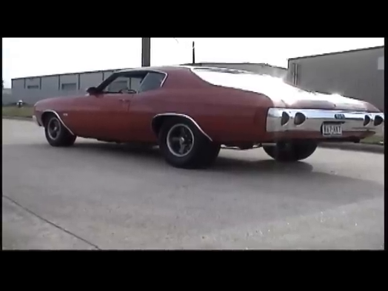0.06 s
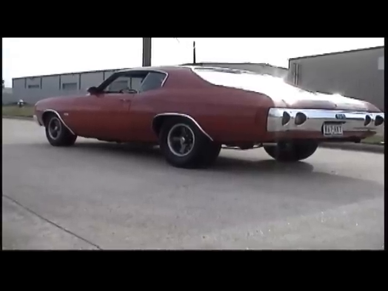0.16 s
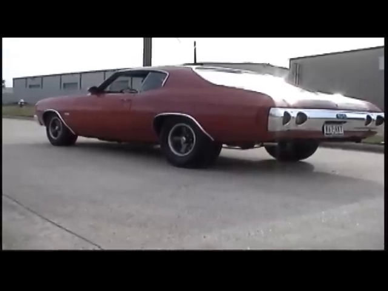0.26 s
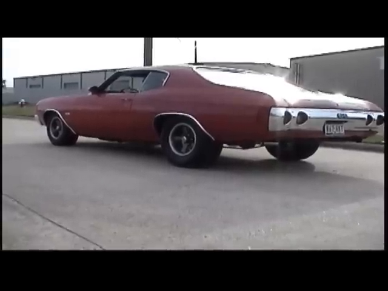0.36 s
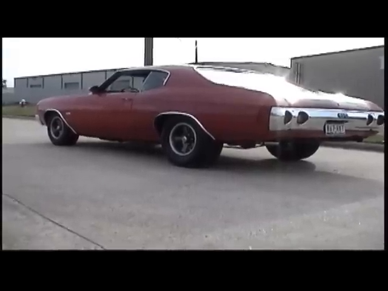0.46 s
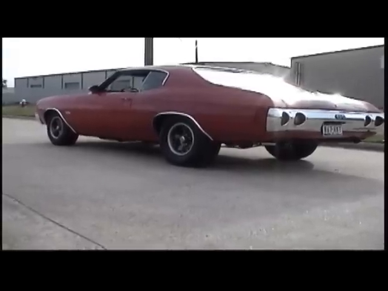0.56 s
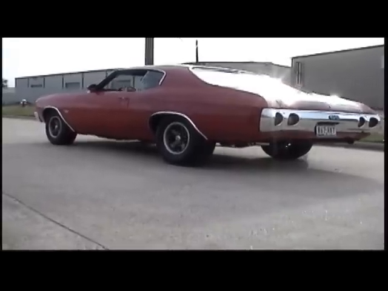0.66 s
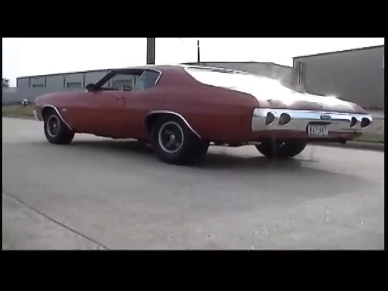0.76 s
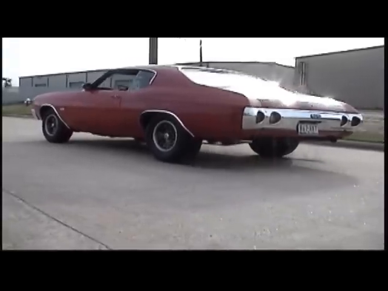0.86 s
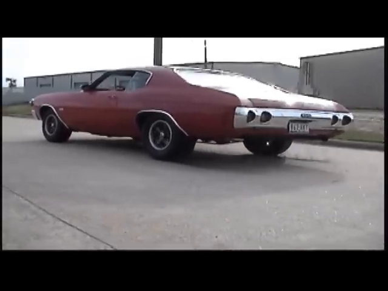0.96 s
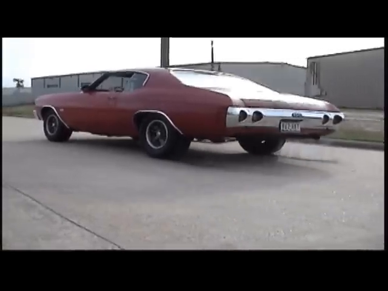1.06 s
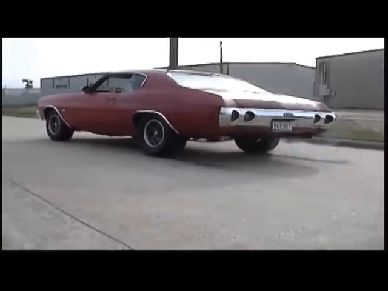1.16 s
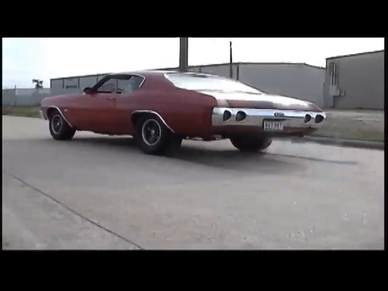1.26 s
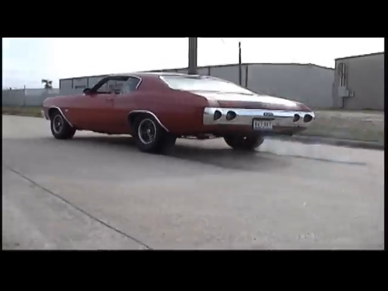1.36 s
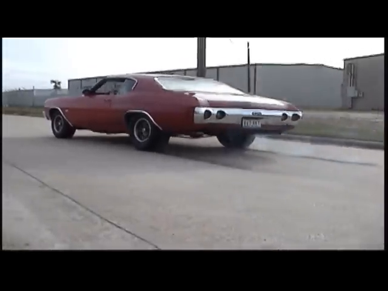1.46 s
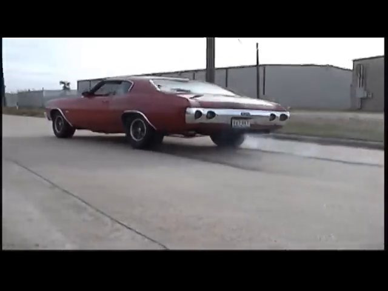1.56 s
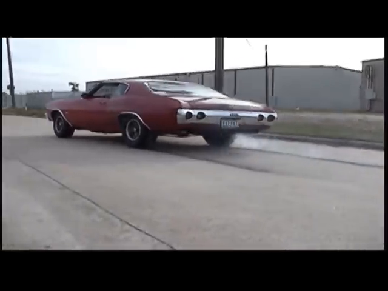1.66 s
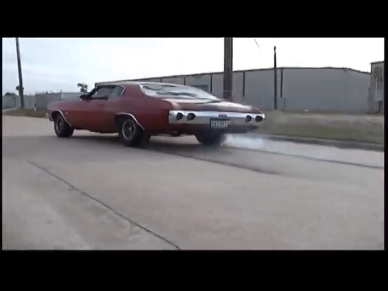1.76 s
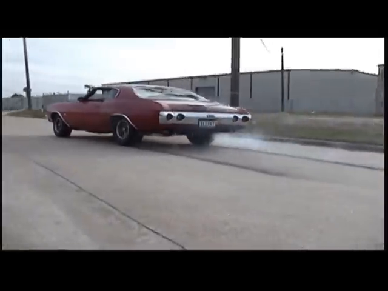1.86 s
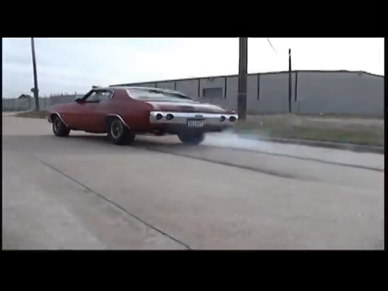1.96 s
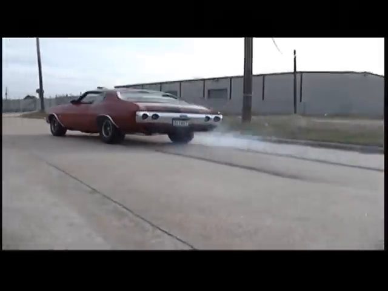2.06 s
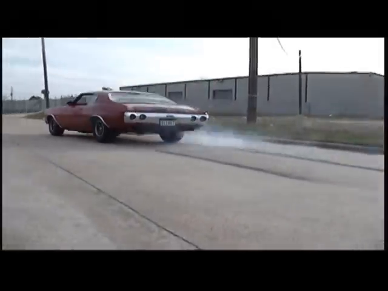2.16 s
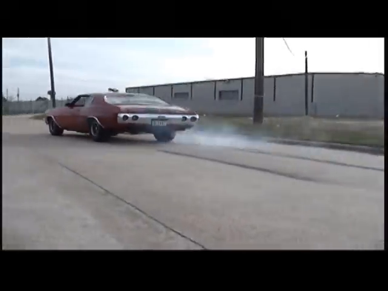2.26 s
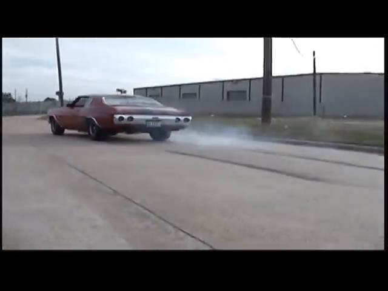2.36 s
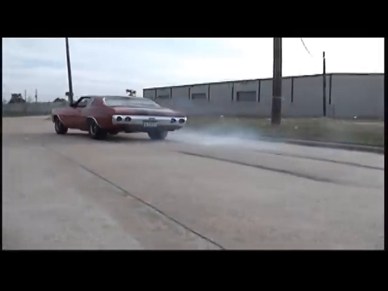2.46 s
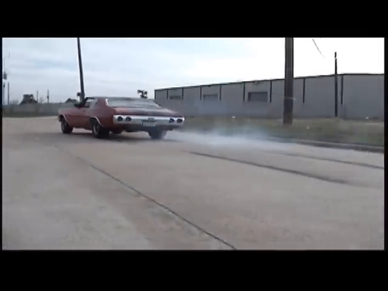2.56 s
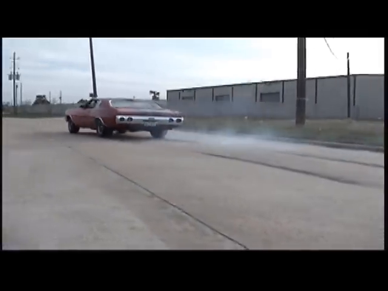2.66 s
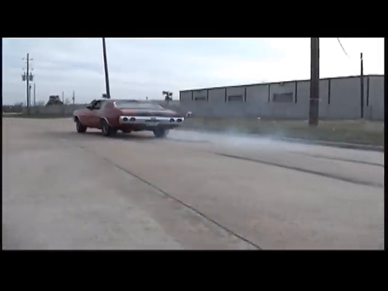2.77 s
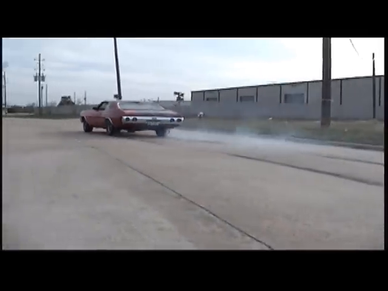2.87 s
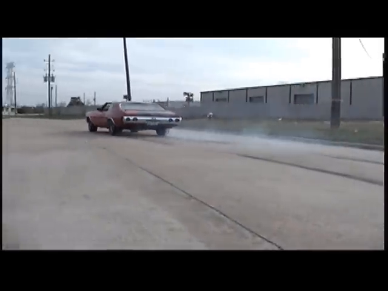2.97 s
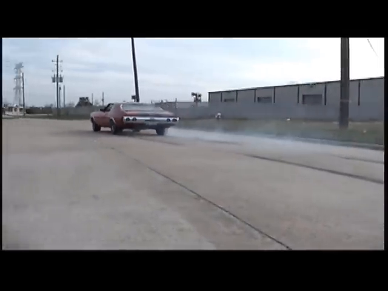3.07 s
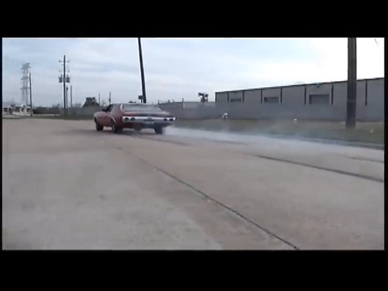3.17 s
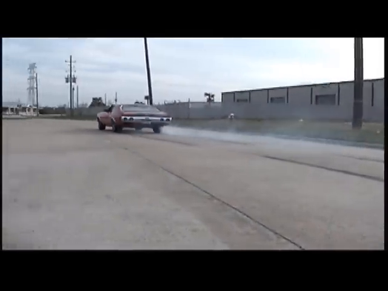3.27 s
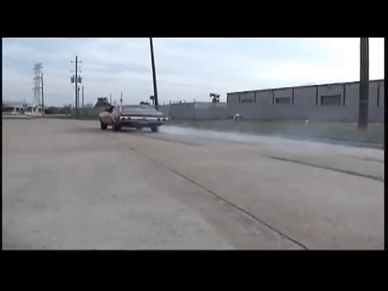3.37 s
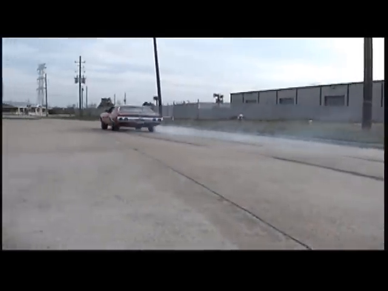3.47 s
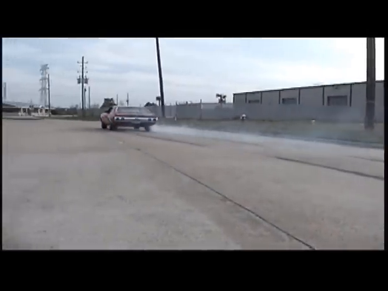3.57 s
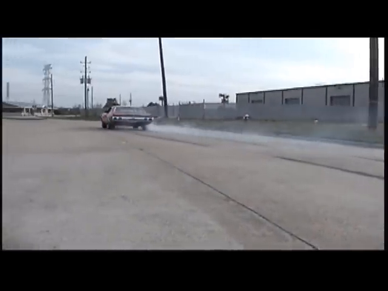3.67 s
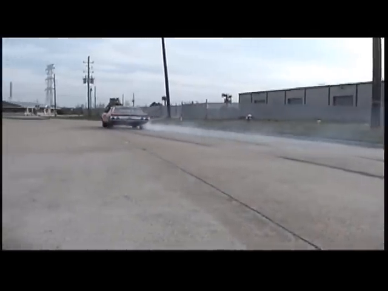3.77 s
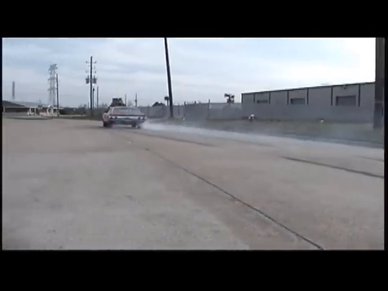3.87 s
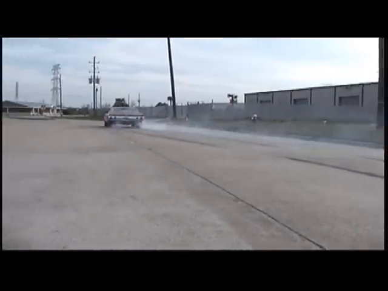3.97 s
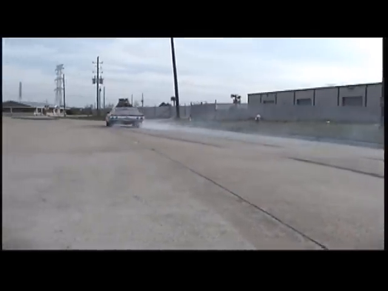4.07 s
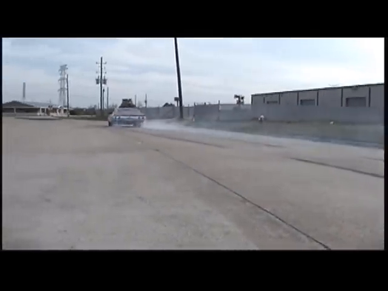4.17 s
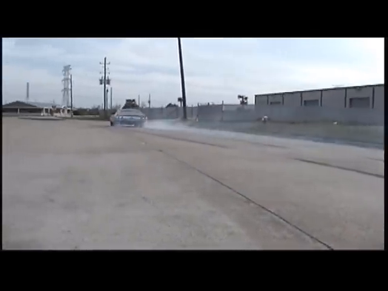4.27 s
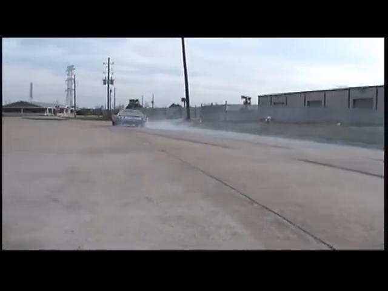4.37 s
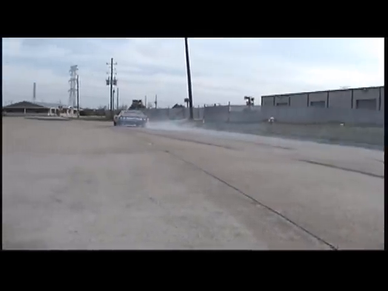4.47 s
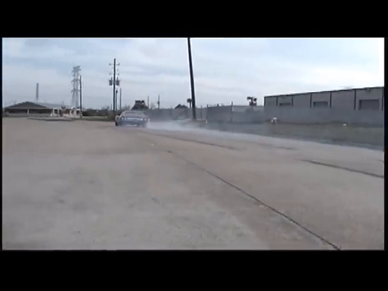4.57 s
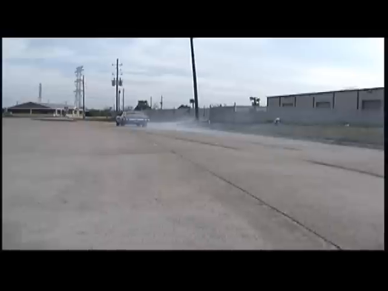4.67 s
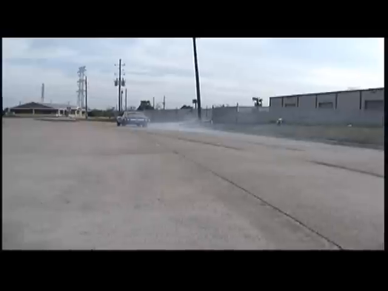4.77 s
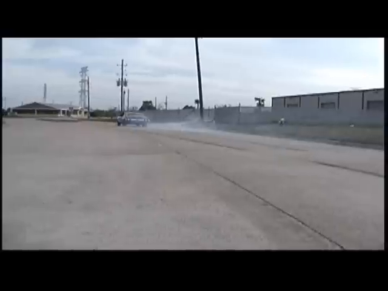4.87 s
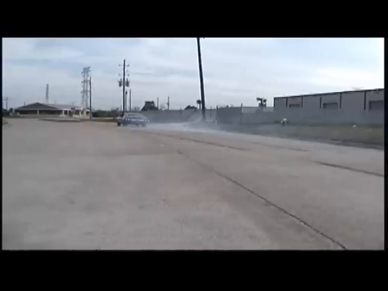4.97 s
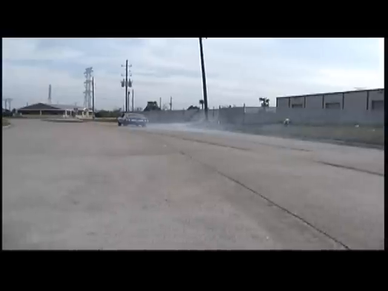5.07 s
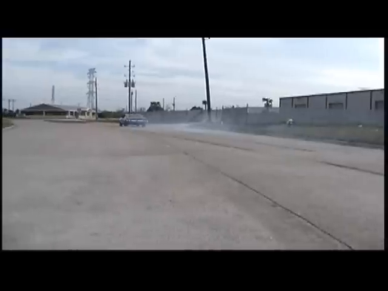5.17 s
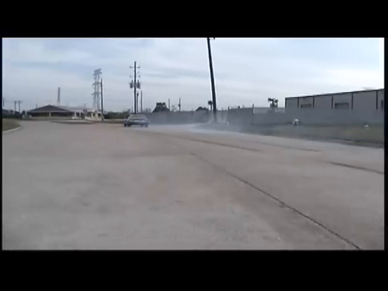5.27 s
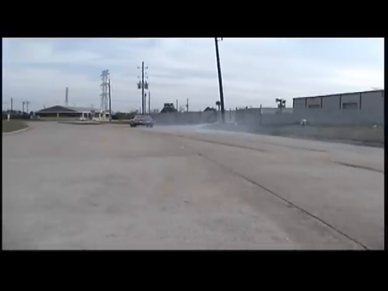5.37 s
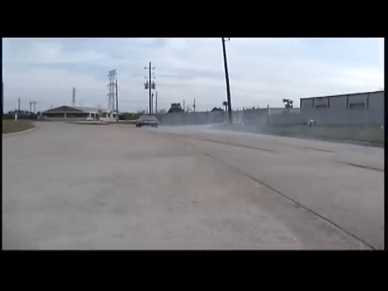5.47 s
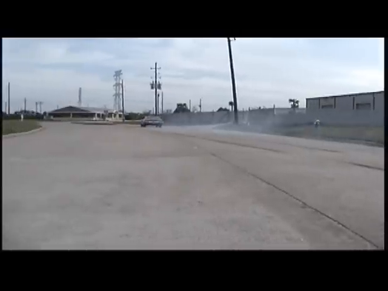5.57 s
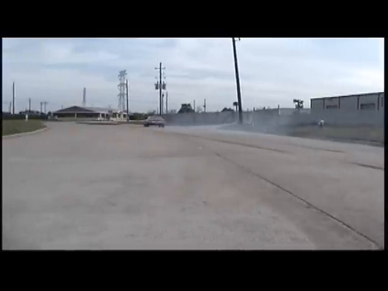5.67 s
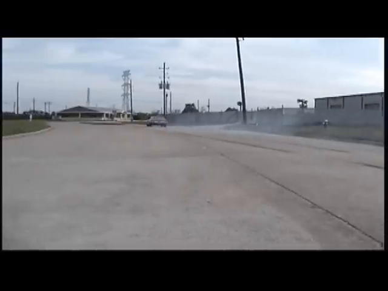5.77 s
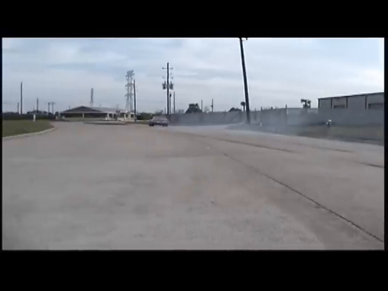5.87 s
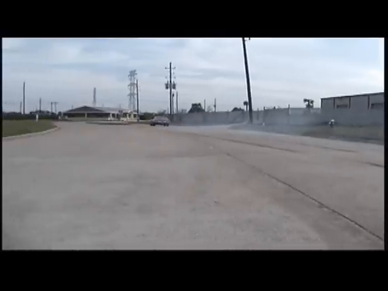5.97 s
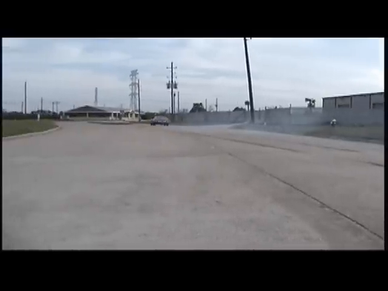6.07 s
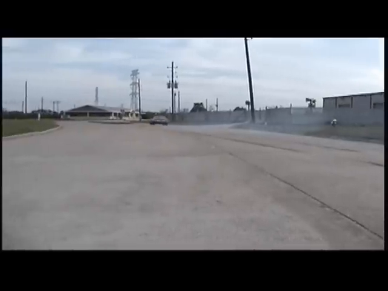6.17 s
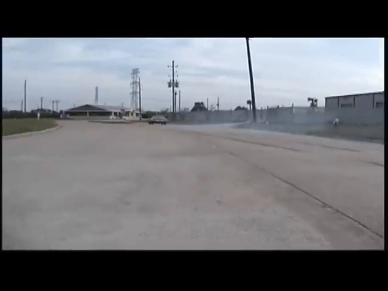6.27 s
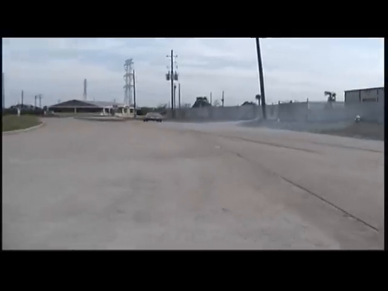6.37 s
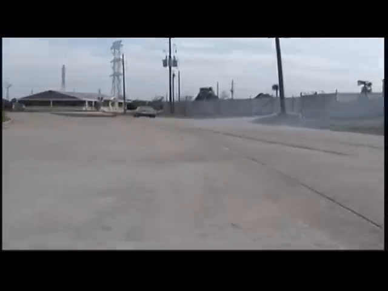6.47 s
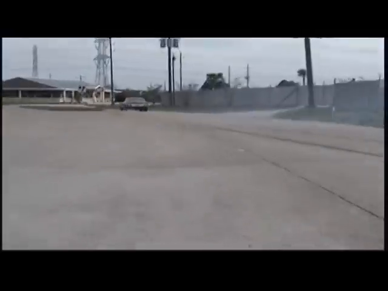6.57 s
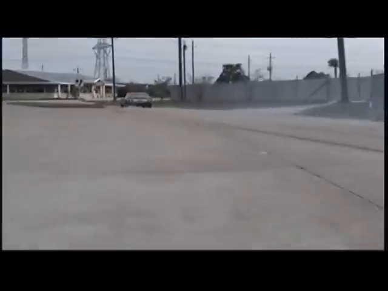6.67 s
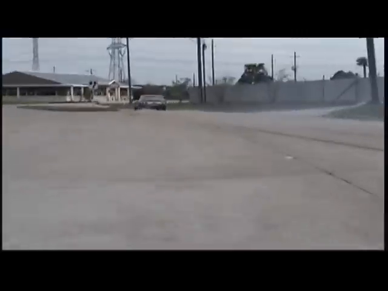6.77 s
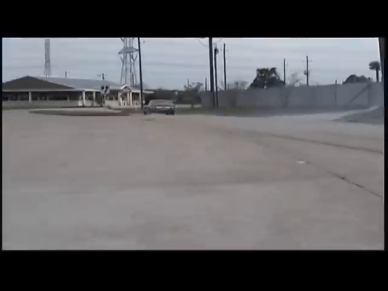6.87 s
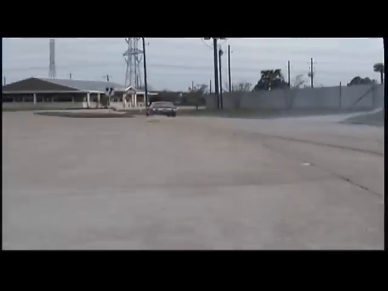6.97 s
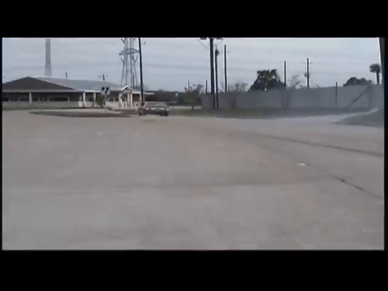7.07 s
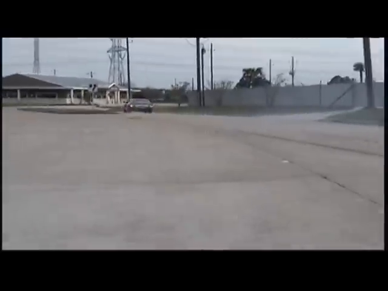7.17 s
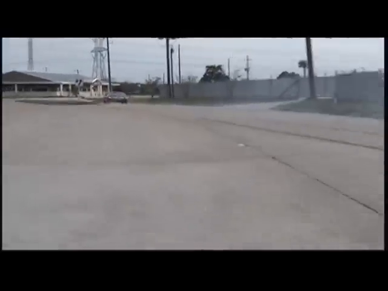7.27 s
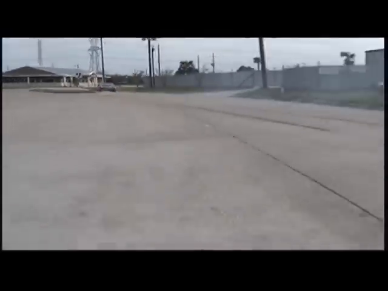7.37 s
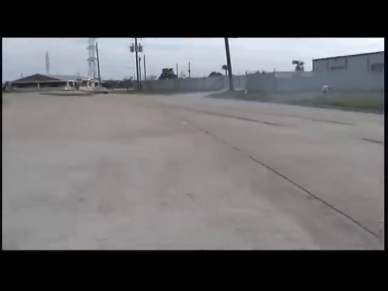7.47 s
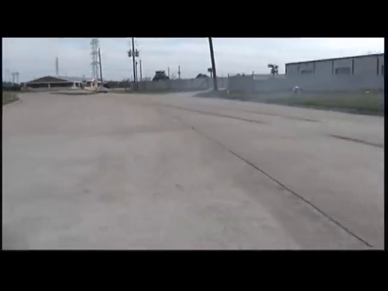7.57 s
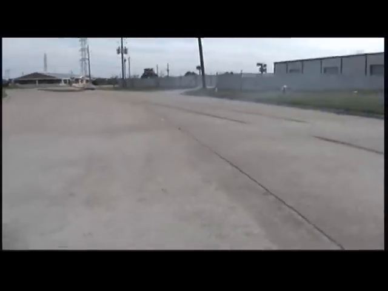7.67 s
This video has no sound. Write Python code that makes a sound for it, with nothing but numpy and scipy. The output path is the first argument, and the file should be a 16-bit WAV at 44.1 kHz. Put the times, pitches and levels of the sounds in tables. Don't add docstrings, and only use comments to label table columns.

```python
import sys
import numpy as np
from scipy import signal
from scipy.fft import rfft, irfft, next_fast_len
from scipy.io import wavfile
from scipy.ndimage import uniform_filter1d

SR = 44100
rng = np.random.default_rng(int(sys.argv[2]) if len(sys.argv) > 2 else 0)


def put_to_file(sound):
    columns = np.atleast_2d(sound).T
    safe = np.clip(columns, -1, 1)
    whole_steps = np.round(safe * 32767)
    wavfile.write(sys.argv[1], SR, whole_steps.astype(np.int16))


def voltage_ratio(level):
    return 10 ** (np.asarray(level, float) / 20)


N = 340222
PADDED = next_fast_len(N, True)

# t/s, level/dB, load/0-1
DRIVE = [(0, -30, 0), (.03, -28.5, 0.08), (.45, -30, 0), (.6, -31, 0.46), (1.05, -28.5, 1),
         (1.25, -27, 0.1), (1.82, -24, 0.54), (1.91, -33, 0.3), (2.0, -28.5, 0.37), (2.3, -31, 0.24),
         (3.0, -30, 0.36), (3.5, -31, 0.4), (4.05, -31.5, 0.5), (4.09, -42, 0.01), (4.4, -45, 0),
         (4.55, -36.5, 0.44), (5.32, -45, 0.26), (6.63, -42.5, 0.43), (6.77, -60, 0)]
# t/s, rate/cycles per s
REVS = [(0, 16.1), (.2, 16.6), (.59, 16.6), (.66, 22), (.78, 25.3), (1, 28.3), (1.2, 32.6), (1.55, 37.6),
        (1.85, 40.7), (1.93, 38.6), (2.2, 32.6), (2.27, 31.8), (2.6, 28.9), (2.9, 30.8), (3.5, 32.9),
        (4.04, 33.5), (4.4, 26.5), (4.7, 20.9), (5, 20.2), (5.3, 16.7), (5.43, 16.5), (5.7, 17.85),
        (5.85, 17.5), (6, 18), (6.2, 18.6), (6.67, 20.1)]
# start t/s, length/s, extra level/dB
STABS = [
    (0.462, 0.17, 5),
    (2.275, .14, 5.5),
    (4.409, 0.062, 4),
    (5.248, 0.025, 6),
]


def noise(*shape):
    return rng.standard_normal((*shape, N))


def level(x, db):
    return x * voltage_ratio(db) / np.sqrt(np.mean(x ** 2))


def curves(tables):
    s, *columns = np.concatenate(tables).T
    return [np.interp(np.arange(N) / SR, s, c) for c in columns]


def along(points):
    hz, value = np.transpose(points)
    bin_hz = np.arange(PADDED // 2 + 1) * SR / PADDED
    return np.interp(np.log(bin_hz + 1), np.log(hz), value)


def shape(x, gain):
    return irfft(rfft(x, PADDED) * gain, PADDED)[..., :N]


def colour(x, points):
    return shape(x, voltage_ratio(along(points)))


def walk(rate):
    k = int(SR / rate)
    held = np.repeat(rng.standard_normal(N // k + 1), k)
    w = uniform_filter1d(uniform_filter1d(held, k), k)[:N]
    return w / w.std()


def resonate(x, hz, width_hz):
    return signal.lfilter(*signal.iirpeak(hz, hz / width_hz, SR), x)


def bumps(rows, width_s=None):
    t = np.arange(N) / SR
    return sum(row[1] * np.exp(-((t - row[0]) / (width_s or row[2])) ** 2) for row in rows)


def gate(start, end, rise_s, fall_s):
    risen = start + rise_s
    times = [start, risen, max(end, risen), max(end + fall_s, start + 2 * rise_s)]
    return np.interp(np.arange(N) / SR, times, [0, 1, 1, 0])


def decays(events, decay_s):
    t = np.arange(N) / SR
    return sum(voltage_ratio(db) * np.exp(-np.maximum(t - s, 0) / decay_s) * (t > s) for s, db in events)


def throttle(spinning):
    (hz,), (db, load) = curves([REVS]), curves([DRIVE])
    idle = gate(-1, STABS[0][0], .1, .1)
    stabs = [gate(s, s + length, 0.027, 0.0099) for s, length, _ in STABS]
    stab = sum(stabs)
    flare, flare_fall_s = 3.8, .19
    hz = hz + flare * sum(gate(s, s, .8 * length, flare_fall_s + length) for s, length, _ in STABS[1:-1])
    hunt = .006 * np.clip(2 - hz / 16, .15, 1) * walk(15)
    hz = hz * (1 + hunt + .012 * idle * walk(12))
    scatter_db = .4 + 2.2 * stab + .6 * np.clip(2 - hz / 16, 0, 1) + 1.2 * idle
    spin_duck_db, spin_gas_db = -4.5, 5.5
    db = db + sum(g * row[2] for g, row in zip(stabs, STABS)) + spin_duck_db * spinning
    boom_db = 8.5 - 30 * load - 8 * stab
    last_pull = (6.5, 4, 0.24)
    gas_db = -7 + spin_gas_db * spinning + stab + bumps([last_pull])
    return hz, scatter_db, db, boom_db, gas_db


def overrun(spinning):
    full_fall = 11
    fall = -np.gradient(curves([REVS])[0]) * SR / full_fall
    shut = np.clip(fall, 0, 1) * (1 - spinning)
    shut = shut * (1 - sum(gate(s, s + length, .01, .01) for s, length, _ in STABS))
    return uniform_filter1d(shut, size=2000)


def firings(hz, scatter_db, shut):
    # level/dB, header lag/ms
    cylinders = [(3.6, .3), (-4.5, -.2), (-10, .13), (.5, -.5), (-6, -.27), (-6, .07), (0, .16), (-6, .3)]
    # level/dB, lag/ms
    shut_cylinders = [(0, .6), (-4, .3), (12, 0), (-4, -.3), (10.5, -.8), (-6, .2), (3, -1.5), (-3, 1.2)]
    # level gained at full revs/dB, lag/s
    banks = [(0, 0.), (15, .0002)]
    firing_banks = [0, 1, 1, 0, 1, 0, 0, 1]
    # t/s, level over the mean firing/dB
    backfires = [
        (0.183, 5.5),
        (2.292, 7.5),
        (2.297, 6),
        (4.462, 4),
        (6.178, 3.5),
        (0.492, 4.5),
        (.553, 6.5),
        (.597, 5.5),
        (2.265, -1),
        (4.428, 7.5),
    ]
    pop_s = 2.2335
    turns = np.cumsum(8 * hz / SR)
    turns = np.floor(turns - turns[int(pop_s * SR)] + 2)
    at = np.flatnonzero(np.diff(turns)) + 1
    chance = rng.standard_normal((len(at), 2))
    cylinder = turns[at].astype(int) % len(cylinders)
    cylinder_db, header_ms = np.array(cylinders)[cylinder].T
    bank_db, lag = np.array(banks)[np.array(firing_banks)[cylinder]].T
    shut_db, shut_ms = np.array(shut_cylinders)[cylinder].T
    lumpy = np.clip(hz[at] / 30, .5, 1)
    mix = shut[at]
    size_db = (1 - mix) * (cylinder_db + lumpy * bank_db) + mix * shut_db
    size = voltage_ratio(size_db + scatter_db[at] * chance[:, 0])
    late = (1 - mix) * (lag + header_ms / 1000) + mix * shut_ms / 1000
    late = late + .00007 * scatter_db[at] * chance[:, 1]
    pulses = np.bincount(np.clip(at + (late * SR).astype(int), 0, N - 1), size, N)
    fired = pulses.copy()
    for s, g in backfires:
        fired[int(s * SR)] += voltage_ratio(g) * size.mean()
    return pulses, fired


def exhaust_pipe(fired, shut, boom_db):
    # f/Hz, width/Hz, near level/dB, far level/dB, level at the lot's end/dB
    pipe_modes = [(149, 29, 3.5, 3.5, 1.5), (278.7, 52.5, 3, 1, 2.5), (304.6, 41, 2, 3, 4),
                  (399.3, 74, 6, 0, -1.5), (526, 51, 3, -0.5, -1.5), (574, 43, 2.5, 4.5, -1.5),
                  (647, 39, 3, 2.5, 0), (790, 260, -9, -8, -5)]
    t = np.arange(N) / SR
    away = np.interp(t, (1.6, 2.55), [0, 1])
    gone = np.interp(t, (4.1, 5.3), [0, 1])
    blows = signal.sosfilt(signal.butter(3, [105, 1300], "band", fs=SR, output="sos"), fired)
    pipe = 0
    for k, (f, width, near, far, end) in enumerate(pipe_modes):
        mode_db = near + away * (far - near) + gone * (end - far)
        mode = (-1) ** k * voltage_ratio(mode_db) / np.sqrt(width) * resonate(blows, f, width)
        pipe = pipe - (voltage_ratio(boom_db) * mode if k == 0 else mode)
    pipe = pipe - shut * (1 - away) * voltage_ratio(-4) * blows * np.std(pipe) / np.std(blows)
    return pipe / np.sqrt(uniform_filter1d(pipe ** 2, SR // 4))


def exhaust_gas(pulses, shut):
    # f/Hz, level/dB per Hz
    gas_spectrum = [(500, -9.5), (850, -4.5), (1300, -11.5), (1900, -14), (2300, -10.5), (2800, -18),
                    (4400, -26), (9000, -25.5), (12000, -32.5), (15000, -60)]
    puff_s = .003
    puff = signal.lfilter([1], [1, -np.exp(-1 / (puff_s * SR))], pulses) + .4
    puff = puff / uniform_filter1d(puff, SR // 4)
    puff = 1 + (1 - .75 * shut) * (puff - 1)
    gas = puff * colour(noise(), gas_spectrum)
    roar = signal.sosfilt(signal.butter(2, [130, 750], "band", fs=SR, output="sos"), puff * noise())
    return level(gas, 0), level(roar, -21)


def engine(spinning):
    hz, scatter_db, db, boom_db, gas_db = throttle(spinning)
    shut = overrun(spinning)
    pulses, fired = firings(hz, scatter_db, shut)
    pipe = exhaust_pipe(fired, shut, boom_db)
    gas, roar = exhaust_gas(pulses, shut)
    crest_s, depth_db = 6.192, 5
    cycles = np.cumsum(hz) / SR
    throb = np.cos(2 * np.pi * (cycles - cycles[int(crest_s * SR)]))
    db = db + depth_db * gate(5.55, 6.4, .1, .1) * throb
    gas_db = gas_db + 4 * shut - 3.5 * gate(-1, STABS[0][0], .1, 0.023)
    running = np.arange(N) < DRIVE[-1][0] * SR
    return running * voltage_ratio(db) * (pipe + voltage_ratio(gas_db) * gas + roar)


def lot():
    # f/Hz, level/dB per Hz
    lot_spectrum = [(60, -11.5), (200, 5.5), (700, -7), (1500, -11.5), (3500, -28), (8000, -38.5),
                    (12000, -35.5), (15500, -31)]
    mid, left, right = colour(noise(3), lot_spectrum)
    return level(mid + .25 * np.array([left, right]), -48)


def camera():
    # multiple of the motor rate, level/dB
    motor_lines = [(8, -70), (9, -70), (15, -76), (17, -76), (19, -79), (25, -82), (26, -77), (28, -81),
                   (30, -83), (32, -80), (34, -84), (36, -84), (39, -84), (40, -84), (46, -87), (49, -89),
                   (51, -87), (54, -87), (58, -88), (64, -87)]
    # t/s, peak level/dB
    housing_ticks = [
        (6.849, -39),
        (7.5336, -52),
    ]
    motor_hz, scan_hz, scan_db = 149.83, 15735, -101
    t = np.arange(N) / SR
    multiples, turn = np.arange(10, 100), np.linspace(0, 1, 2049)
    chance = rng.standard_normal(90)
    phase = np.pi / 2 * (np.arange(100) % 2) + 2 * rng.random(100)
    weak_db = -82 - .18 * multiples + 4 * chance
    lines = dict(zip(multiples, weak_db)) | dict(motor_lines)
    cycle = sum(voltage_ratio(db) * np.sin(2 * np.pi * k * turn + phase[k]) for k, db in lines.items())
    motor = np.interp(motor_hz * t % 1, turn, cycle)
    whine = np.sqrt(2) * (motor + voltage_ratio(scan_db) * np.sin(2 * np.pi * scan_hz * t))
    housing = resonate(resonate(noise(), 3800, 9000), 3800, 7000)
    return whine + decays(housing_ticks, 0.0013) * level(housing, 0)


def wind():
    # t/s, level/dB
    wind_course = [(.5, -47), (.7, -54), (1.5, -49), (2.0, -53), (2.4, -60), (2.6, -56), (3.4, -54),
                   (3.6, -50.5), (4.6, -50), (5.3, -36), (6.5, -49), (6.65, -37.5), (6.82, -42.5),
                   (7.19, -33), (7.42, -27), (7.58, -33.5), (7.66, -43), (7.71, -37)]
    # f/Hz, level/dB per Hz
    air_spectrum = [(15, -11.5), (30, 11.5), (70, 2), (110, -0.5), (280, 1), (335, -0.5), (560, -9.5),
                    (1800, -35), (3400, -44), (15000, -92.5)]
    thuds = voltage_ratio(1.5 * walk(50) + 2.5 * walk(150))
    side, mid = colour(noise(2) * thuds, air_spectrum)
    gusts = level(side, 1.3) * np.array([[1], [-1]]) + level(mid, -11.0)
    return voltage_ratio(curves([wind_course])[0] + 0.6 * walk(15)) * gusts


def belt():
    # t/s, extra level/dB, length/s
    chirps = [
        (.08, 12.5, 0.086),
        (.19, 11, 0.029),
        (.53, 18, 0.096),
    ]
    belt_hz, width_hz, belt_db, end_s = 2284, 170, -50, .63
    bursts = voltage_ratio(1.95 * walk(72.2)) * noise()
    ring = resonate(resonate(bursts, belt_hz, width_hz * 2), belt_hz, width_hz)
    return gate(0, end_s, 0.012, 0.02) * voltage_ratio(belt_db + bumps(chirps)) * level(ring, 0)


def slip_rate():
    # t/s, f/Hz
    slip_course = [
        [(.606, 1420), (.625, 1200), (.645, 1127), (.706, 1123), (.73, 1168), (.88, 1165), (1.05, 1215),
         (1.73, 1250), (1.81, 1225), (1.9, 1235), (1.96, 1285), (1.99, 1240)],
        [(2.375, 1400), (2.41, 1270), (2.435, 1150), (2.485, 1155), (2.515, 1240), (3.52, 1235), (3.6, 1165),
         (3.64, 1235), (3.72, 1200), (3.83, 1198), (3.88, 1240), (3.91, 1180), (3.975, 1290), (4.0, 1190),
         (4.02, 1270), (4.1, 1240)],
        [(4.52, 1228), (4.62, 1160), (4.67, 1228), (4.7, 1205), (4.755, 1245), (4.805, 1193), (4.87, 1225),
         (4.9, 1155), (4.93, 1158), (4.96, 1200), (4.98, 1160), (5.03, 1175), (5.15, 1245), (5.18, 1175),
         (5.24, 1246)],
    ]
    drift = .003 * walk(30)
    flutter = .015 * gate(2.45, 4.1, .1, .1) * walk(140)
    return curves(slip_course)[0] * (1 + drift + flutter)


def tyre(hz, db, octave_db, wobble, flicker_db, rough):
    # multiple of the slip rate, level/dB
    overtones = [(3, -17.5), (4, -31)]
    out = 0
    for patch_db, loose in ((0, 1), (-8, 2), (-13, 4)):
        jitter = rough * (wobble * loose * walk(45) + .015 * walk(350))
        phase = 2 * np.pi * np.cumsum(hz * (1 + jitter)) / SR
        tone = voltage_ratio(flicker_db * walk(110)) * np.sin(phase)
        tone = tone + voltage_ratio(octave_db + 1.6 * walk(130)) * np.sin(2 * phase)
        for k, g in overtones:
            tone = tone + voltage_ratio(g + .5 * octave_db + 3 * walk(150)) * np.sin(k * phase)
        out = out + voltage_ratio(patch_db / rough) * tone
    return np.sqrt(2) * voltage_ratio(db) * out


def tyres():
    # start t/s, end t/s
    spins = [
        (.608, 1.992),
        (2.378, 3.94),
        (3.953, 4.0),
        (4.013, 4.105),
        (4.518, 4.917),
        (4.957, 5.175),
        (5.214, 5.256),
    ]
    # t/s, level/dB, octave level/dB, wilder tyre's level re steadier/dB
    tread = [(.6, -19, -8, -27), (.69, -17.5, -10.5, -26), (.715, -19, -4.5, -19), (.84, -21, -4.5, -4),
             (1.25, -21, -4, -0.5), (1.7, -22, 3, -4), (1.96, -23, -2.5, -5), (1.99, -28, -20, -4),
             (2.38, -35, -18, 7), (2.43, -19.5, 1.5, -5.5), (2.5, -22, -0.5, -4), (2.65, -23.5, -1, -2),
             (2.95, -22.5, -4, -6), (3.25, -22, -8.5, -5), (3.6, -24.5, -7.5, -11), (3.93, -24.5, -4, -12),
             (4.0, -35.5, -7.5, -4), (4.53, -32, -16, -19), (4.64, -25, -4, -14),
             (4.76, -27.5, -3.5, -11.5), (4.9, -24.5, -12.5, -9), (4.975, -24, -7, -17.5),
             (5.02, -29, -16.5, -11.5), (5.06, -26, -8, -10.5), (5.11, -33.5, -1, -18.5),
             (5.14, -24, -10.5, -18), (5.18, -28.5, -6, -19.5), (5.24, -27.5, -29, -14.5)]
    # t/s, rise f/Hz, swell level/dB
    whoops = [(.74, 95, 7), (.822, -10, 5), (0.889, 99.5, -4), (0.979, 90.5, -2.5), (1.051, 110.5, -3),
              (1.122, 60, -3), (1.21, 20.5, -1.5), (1.27, 69.5, -2.5), (1.43, 101, 0), (1.487, 45, 1.5),
              (1.535, 150, -2.5), (1.732, 100, -2), (1.835, 85, 2), (1.88, 75, -0.5), (1.914, -20, 5),
              (1.965, 5, 5), (2.401, 79.5, -2), (2.491, 110, -8), (2.571, 121.5, -1.5), (2.67, 89, 2),
              (2.79, 100, 3), (3.041, 109.5, 1), (3.209, 169.5, 0), (3.27, -20, 1), (3.36, 108.5, 3),
              (3.679, 48.5, 6), (3.884, -21.5, 0), (3.961, 61.5, 10), (4.035, 0.5, 12.5), (4.76, 29.5, 2),
              (4.86, 43, -5.5), (5.05, 38.5, 0.5)]
    # t/s, level/dB
    rasp = [(.6, -2.5), (.9, 2), (1.5, 1), (2, 2.5), (2.42, -0.5), (2.6, 4), (2.95, 0), (3.3, -1), (3.7, 1),
            (4.05, 6), (4.6, -3.5), (4.9, -3.5), (5.2, -1.5)]
    # f/Hz, level/dB per Hz
    scrub_spectrum = [(300, -15.5), (700, -23.5), (1100, 9), (1500, -9), (1900, -2), (2500, 2.5),
                      (3100, -13.5), (7500, -22), (15000, -31)]
    wild_hz, whoop_s, shut_db, knee_db, squash = 1322.3, .025, -20, -22, 1.93
    bite_s, let_go_s = .013, .016
    loose = np.clip(sum(gate(a, b, bite_s, let_go_s) for a, b in spins), 0, 1)
    hz, (db, octave_db, wild_db) = slip_rate(), curves([tread])
    db = db + shut_db * (1 - loose)
    octave_db = octave_db + shut_db * (1 - loose)
    high_hz = wild_hz + bumps([row[:2] for row in whoops], whoop_s)
    high_db = db + wild_db + bumps([row[::2] for row in whoops], whoop_s)
    spinning = uniform_filter1d(1. * (loose > 0), 500)
    both = spinning * np.hypot(voltage_ratio(db), voltage_ratio(high_db))
    sliding = uniform_filter1d(both, 2500)
    rasping = voltage_ratio(curves([rasp])[0] + 2 * walk(90))
    scrub = sliding * rasping * level(colour(noise(), scrub_spectrum), -10.0)
    rough = np.clip(4.5 * voltage_ratio(high_db - db), .4, 1)
    steady = tyre(hz, db, octave_db + 2.5 * rough * walk(25), .006, 1.6, rough)
    wild = tyre(high_hz, high_db, octave_db - 4, .011, 4, 1.3)
    over = np.maximum(uniform_filter1d(both, 4000) / voltage_ratio(knee_db), 1)
    return spinning * (steady + wild) + scrub, over ** squash, uniform_filter1d(loose, size=1500)


def clinks():
    # t/s, peak level/dB
    knocks = [(2.0465, -40), (2.073, -36), (2.263, -44), (2.3204, -45), (4.1874, -44), (4.2653, -41),
              (4.335, -44), (4.359, -43), (4.374, -45), (4.3944, -45), (4.4293, -41)]
    return decays(knocks, 0.002) * level(resonate(noise(), 2400, 500), 0)


def distance(x):
    # t/s, level/dB
    far_treble = [(0, 2), (2, -2.5), (3.3, -3.5), (3.9, -15), (4.2, -4.5), (4.7, -15), (5.2, -17),
                  (5.5, -9), (7.71, -19)]
    low = signal.sosfiltfilt(signal.butter(2, 4200, fs=SR, output="sos"), x)
    return low + voltage_ratio(curves([far_treble])[0]) * (x - low)


def sheds(x):
    t = np.arange(SR // 2) / SR
    sparse = rng.standard_normal((2, len(t))) * (rng.random((2, len(t))) < .01)
    hits = sparse * (t > .02) * np.exp(-t / 0.067)
    hits = hits / np.sqrt(np.sum(hits ** 2, 1, keepdims=True))
    wet = signal.fftconvolve(x[None], hits, axes=1)[:, :N]
    return voltage_ratio(-18) * signal.sosfilt(signal.butter(1, 2000, fs=SR, output="sos"), wet)


def scene():
    squeal, over, spinning = tyres()
    car = distance(engine(spinning) + belt() + clinks() + squeal) * over
    return car + sheds(car) + wind() + lot() + camera()


def top_cut(x):
    return signal.sosfilt(signal.butter(12, 15660, fs=SR, output="sos"), x)


def record(dry):
    # f/Hz, left lead/rad
    port_phase = [(40, -0.37), (300, -0.14), (1000, -0.091), (5000, 0.29)]
    # f/Hz, left minus right level/dB
    port_balance = [(60, -4), (110, -0.5), (200, -0.5), (380, -0.2), (700, -1.0), (1290, -1), (2380, -0.2),
                    (4400, -2.5), (8120, 0.5), (15000, -6)]
    ceiling, hardness = 0.16, 6.5
    x = dry / ceiling
    flat = ceiling * x / (1 + np.abs(x) ** hardness) ** (1 / hardness)
    flat = signal.sosfilt(signal.butter(1, 8000, fs=SR, output="sos"), flat)
    flat = signal.sosfilt(signal.butter(2, 115, "high", fs=SR, output="sos"), flat)
    flat = signal.sosfilt(signal.butter(3, 12500, fs=SR, output="sos"), flat)
    half = voltage_ratio(along(port_balance) / 2) * np.exp(.5j * along(port_phase))
    left, right = shape(flat, np.array([half, 1 / half]))
    side = signal.sosfiltfilt(signal.butter(1, 6000, fs=SR, output="sos"), left - right)
    side = side + voltage_ratio(-9) * (left - right - side)
    return top_cut((left + right + side * np.array([[1], [-1]])) / 2)


dry = scene()
out = record(dry)
put_to_file(out)
```